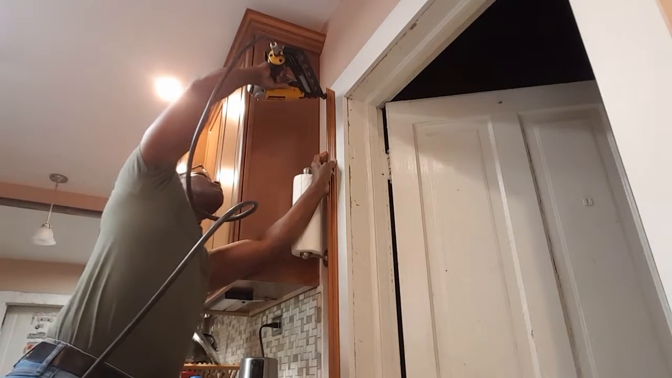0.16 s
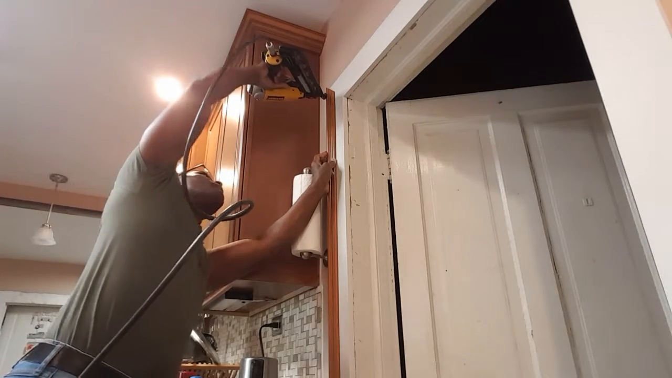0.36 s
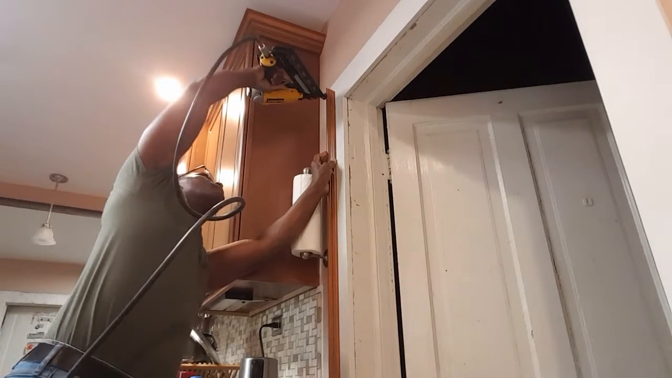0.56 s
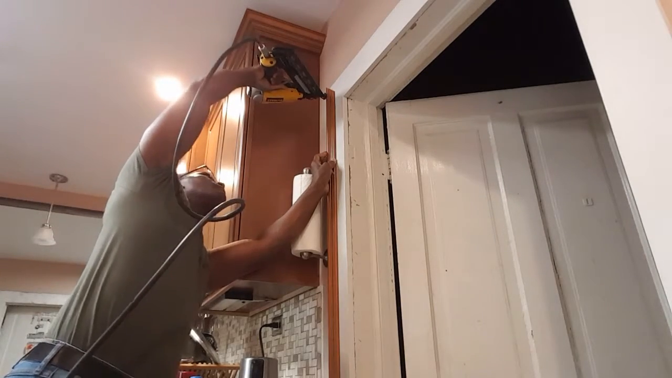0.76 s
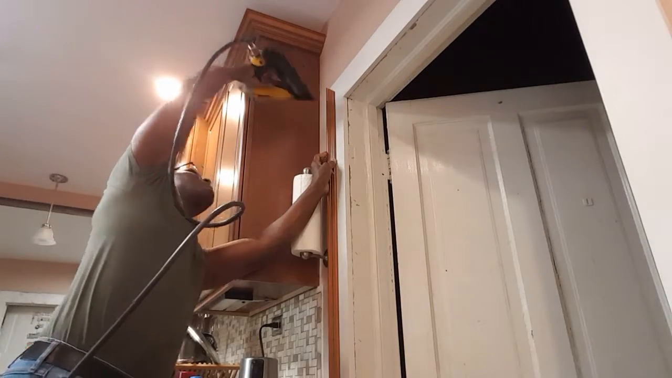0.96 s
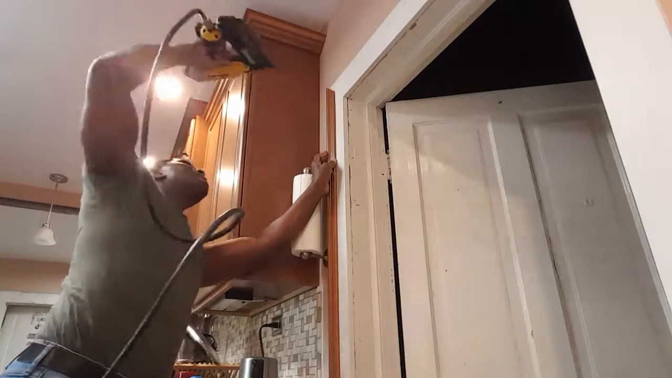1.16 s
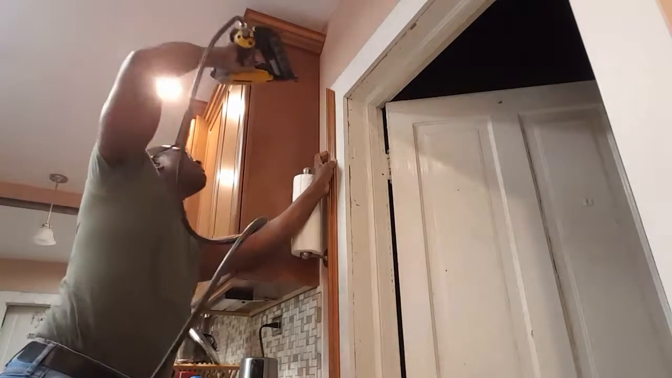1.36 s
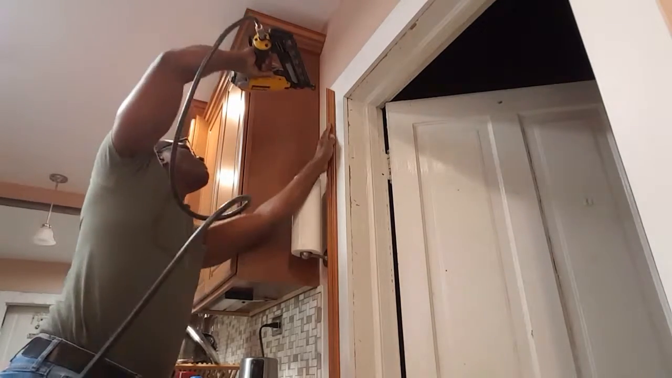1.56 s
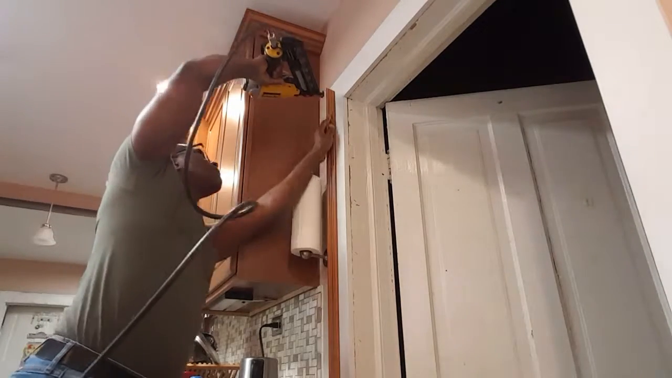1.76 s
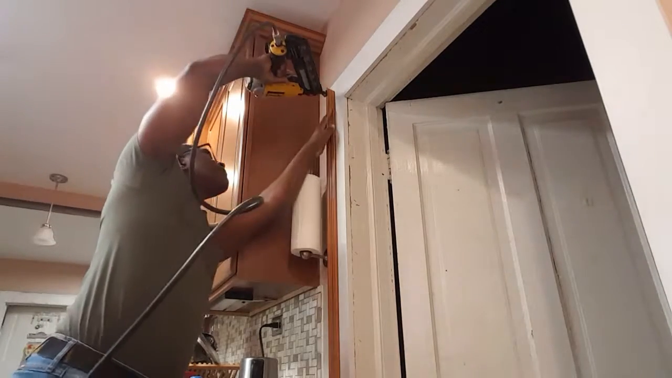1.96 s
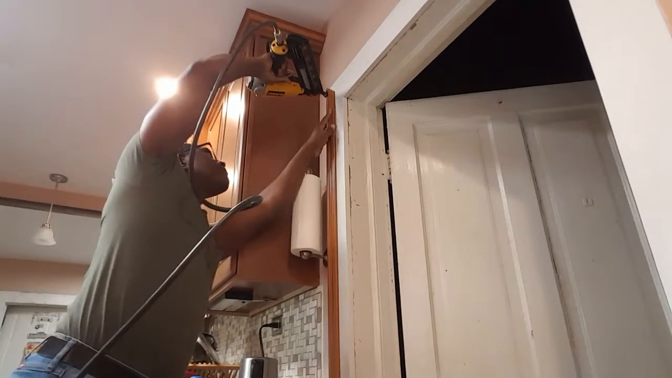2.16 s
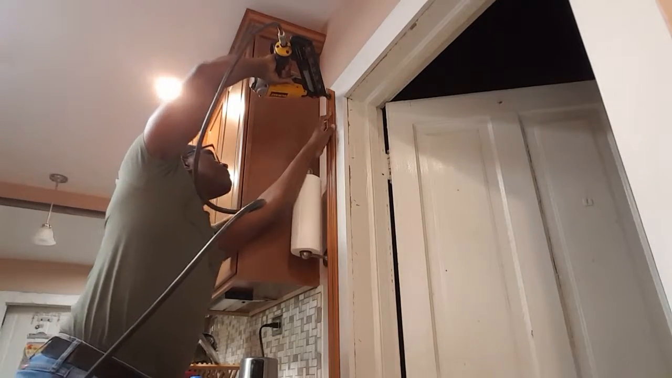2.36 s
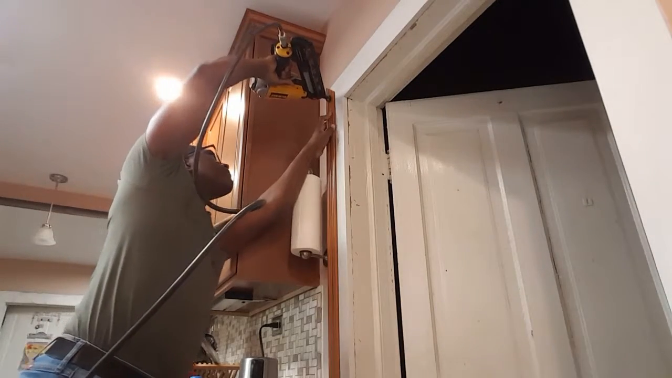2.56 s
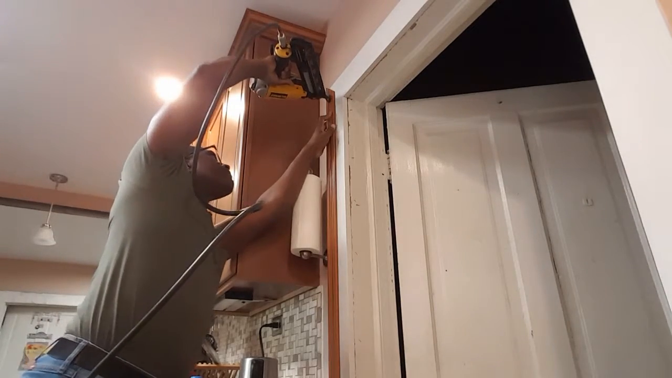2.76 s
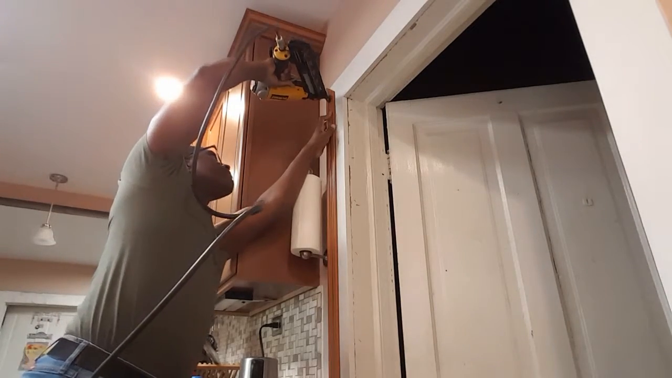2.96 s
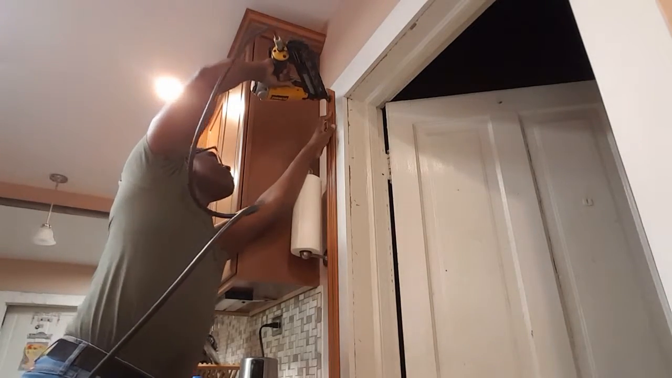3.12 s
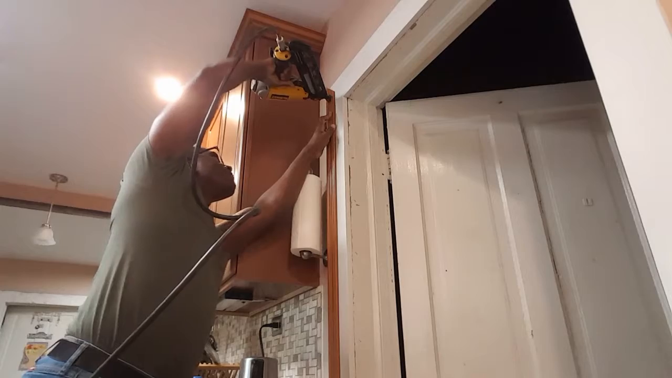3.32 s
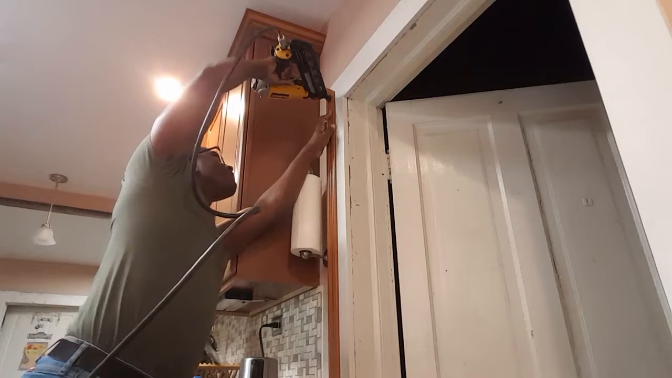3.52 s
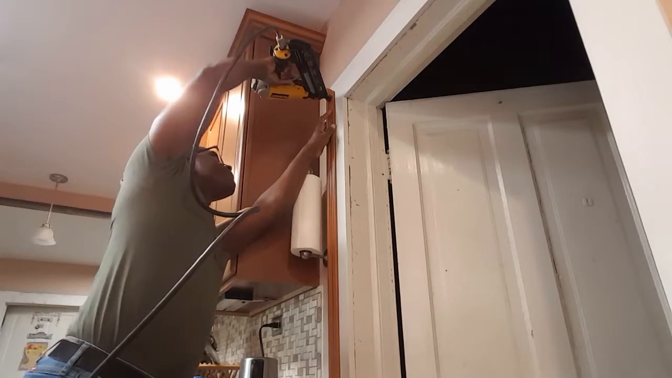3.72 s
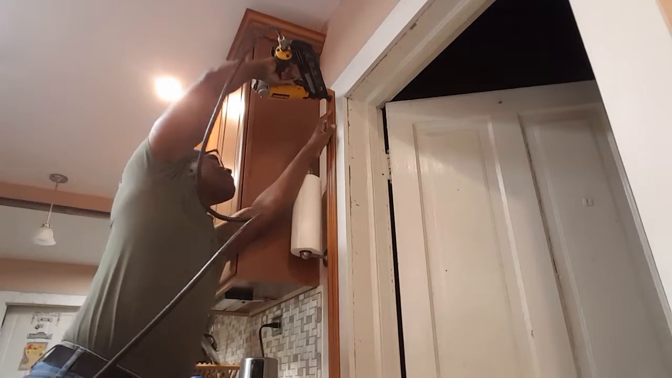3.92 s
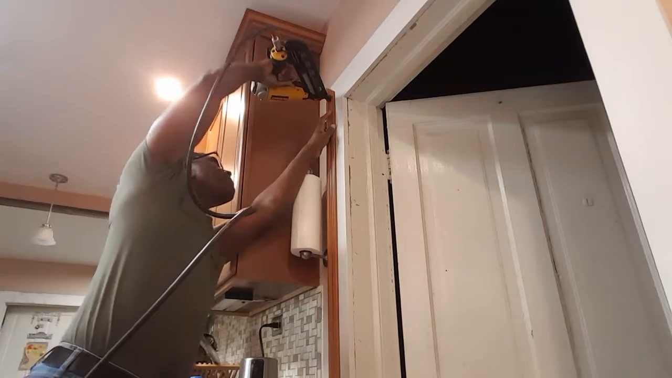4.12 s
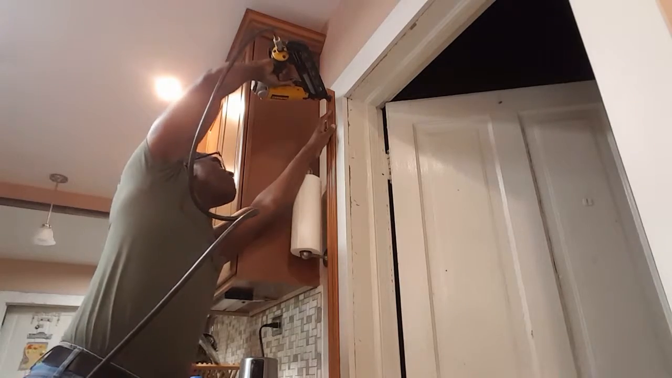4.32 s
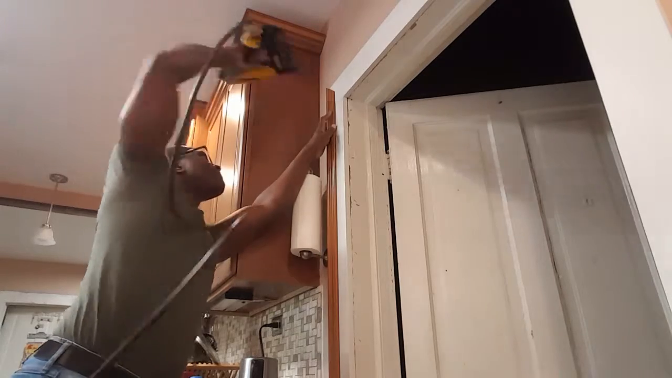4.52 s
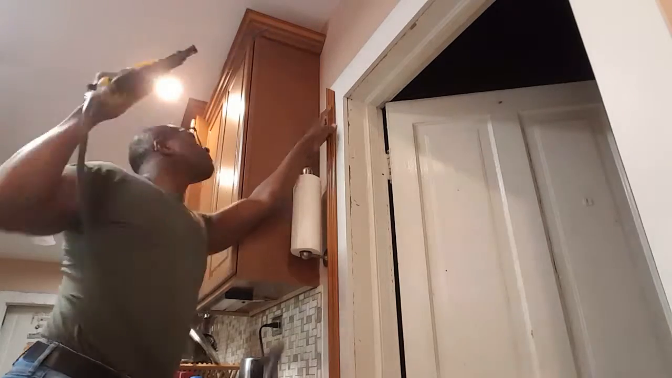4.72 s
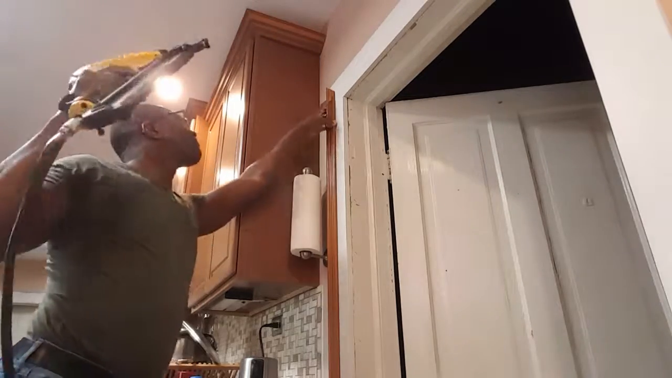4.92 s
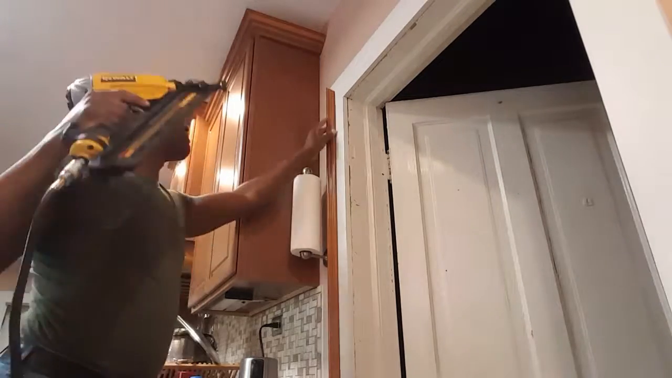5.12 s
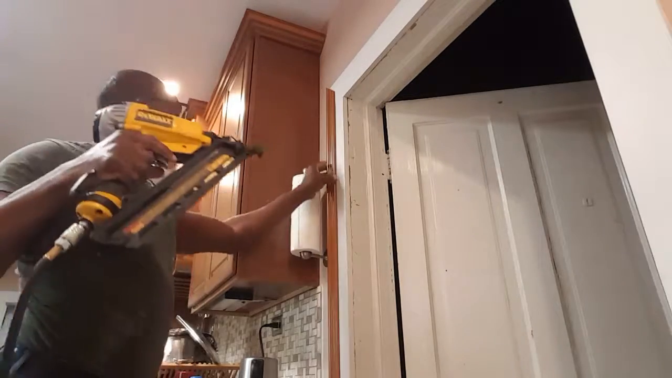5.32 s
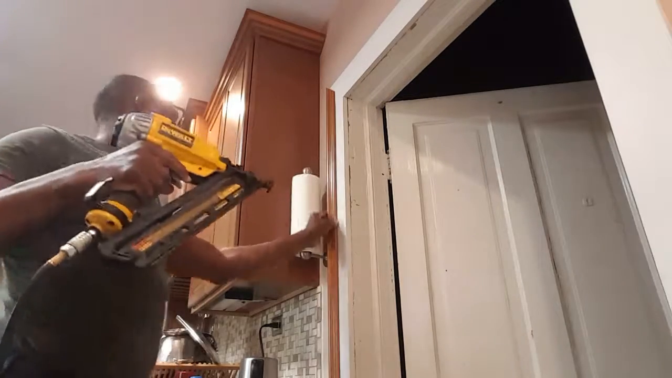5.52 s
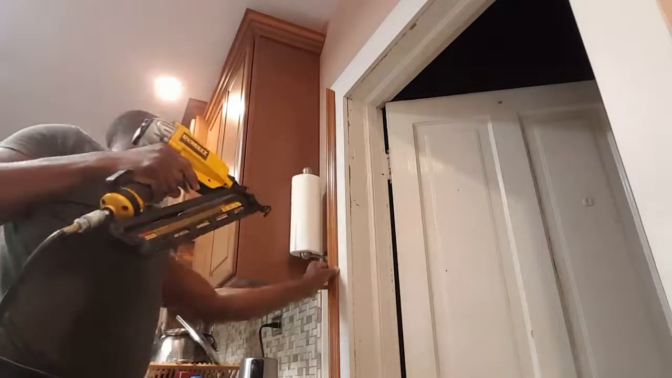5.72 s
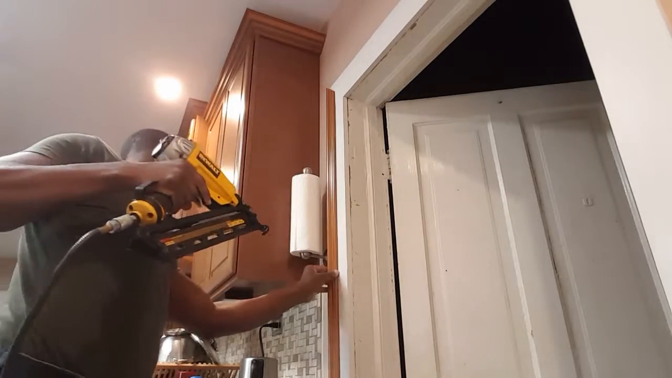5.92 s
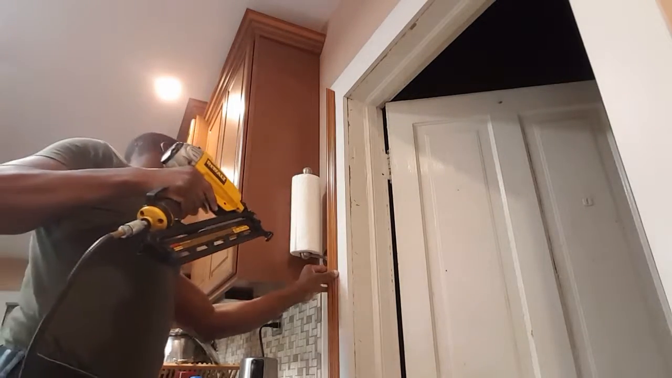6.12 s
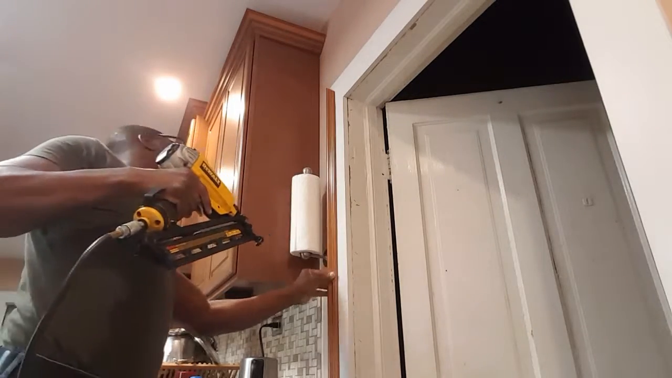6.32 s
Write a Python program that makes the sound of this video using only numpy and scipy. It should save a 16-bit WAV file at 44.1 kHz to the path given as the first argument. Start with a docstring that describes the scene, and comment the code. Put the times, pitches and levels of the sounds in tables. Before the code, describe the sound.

A pneumatic nailer bangs twice into wooden trim in a kitchen, each shot with an air burst, between quiet scuffs, ticks and woody knocks.

```python
"""Kitchen interior, two close microphones on an air nailer at wooden trim, over the house's rush and a low rumble.
First a hand slides while the tool taps, scrapes and ticks along the trim; at 1.04 s the first shot begins.
A shot: safety click, valve hiss, blows that crack and ring, an air blast, a soft piston return, the exhaust.
Then more strokes, ticks, taps and cabinet knocks; the second shot comes at 4.59 s, and handling follows.
Sources are shaped noise and dying modes with kitchen echoes; gain control ducks everything on loud peaks."""
import sys
import numpy as np
from scipy import signal
from scipy.fft import rfft, irfft, next_fast_len
from scipy.io import wavfile
from scipy.ndimage import uniform_filter1d, minimum_filter1d

SR = 44100
rng = np.random.default_rng(int(sys.argv[2]) if len(sys.argv) > 2 else 0)


def unload_wav(signal):
    """Save mono or channel-first audio to the path in sys.argv[1] as 16-bit WAV at rate SR, clipped to [-1, 1]."""
    wavfile.write(
        sys.argv[1],
        SR,
        np.round(np.clip(np.atleast_2d(signal).T, -1, 1) * 32767).astype(np.int16),
    )


N = 285591

# Firing cycles: trigger pulled [t/s], air blast [t/s], piston returns [t/s]
SHOTS = [(1.039, 1.083, 1.1662), (4.587, 4.6, 4.686)]
# Piston blows, fire then nail driven home:
# start [t/s], rattle level [level/dB], rise [t/s], rattle t60 [t/s], crack [level/dB], low push [level/dB]
PISTON_BLOWS = [(1.0784, 5.5, 0.00054, 0.1, 10.5, 2), (1.0919, 8, 0.0015, 0.044, -5, 1.5),
                (4.591, -6.5, 0.0057, 0.069, -15, -9.5), (4.6061, 9.5, 0.0014, 0.05, 9, -10.5)]
# Ring of the tool and trim: mode [f/Hz], relative [level/dB], t60 [t/s]
TOOL_MODES = [(116, -2, 0.1), (172, -0.5, 0.065), (199, 1.5, 0.056), (325, -1.5, 0.15), (413, -6, 0.071),
              (570, -1.5, .08), (726, -1, 0.055), (1115, -1, 0.048), (1270, -6.5, 0.035), (1510, -1, 0.026),
              (1550, 4, 0.03), (1667, 1.5, 0.12), (1790.5, -1.5, .06), (2560, -3.5, 0.057), (3010, 3, .045),
              (3600, -8, 0.025)]
# Crack of the steel driver: mode [f/Hz], relative [level/dB], t60 [t/s]
CRACK_MODES = [(616, -6, 0.019), (900, -4.5, 0.029), (1220, -7.5, 0.02), (1592, 1, 0.028),
               (2390, -6, 0.022), (3130, -4.5, 0.014), (3920, -3.5, 0.017)]
# Colour of the rattling parts: [f/Hz], relative [level/dB per Hz]
RATTLE_SPECTRUM = [(30, -16), (100, -0.5), (200, -0.5), (330, 3.5), (750, -3.5), (1100, 1.5), (1600, 0),
                   (2200, -4.5), (3200, -0.5), (4600, -7), (6000, -22.5), (14000, -41.5)]
# Colour of the piston landing on its bumper: [f/Hz], relative [level/dB per Hz]
BUMPER_SPECTRUM = [(40, -22), (90, -20), (160, -4.5), (380, 0), (750, -3.5), (1300, -3), (2500, -3.5),
                   (4600, -8.5), (6000, -19), (14000, -40.5)]
# Colour of the air jets: [f/Hz], relative [level/dB per Hz]
AIR_SPECTRUM = [(200, -26.5), (800, -17.5), (1500, -8), (3000, -14), (5000, 0), (6400, -1.5), (7300, 1.5),
                (8060, 4), (9500, -0.5), (11000, -5), (13200, -3), (15000, -9.5)]
# Light taps of the nose and magazine: start [t/s], onset [level/dB], treble shelf [level/dB], t60 [t/s]
LIGHT_TAPS = [(.281, -52, 6, 0.035), (.879, -60, 10, .1), (2.025, -51, -14, .13),
              (3.614, -51.5, -12, 0.067), (3.672, -39.5, -5, 0.02), (5.082, -39, -41, 0.073),
              (5.486, -48.5, -7, 0.18), (6.458, -45, -6.5, .05)]
# Thin metallic scrapes of the tool and its hose coupling: start [t/s], onset [level/dB], t60 [t/s], centre [f/Hz]
METAL_SCRAPES = [(.138, -46, 0.025, 5050), (0.146, -60, 0.053, 6270), (2.262, -65.5, 0.031, 8520),
                 (2.285, -73.5, 0.026, 8530), (2.823, -54.5, 0.06, 7680)]
# Knocks that ring the cabinet: start [t/s], panel [level/dB], pitch [factor on the panel modes],
# contact [level/dB], treble shelf [level/dB], contact t60 [t/s]
CABINET_KNOCKS = [(1.616, -37, 1.14, -48.5, 1, 0.11), (3.769, -38, 1.11, -43, -5, 0.021),
                  (3.997, -25.5, 1.02, -47.5, 11, 0.088), (5.564, -36, 1.31, -39.5, -14, 0.095),
                  (5.943, -36, 1.063, -49.5, 13.5, 0.14), (6.161, -31, 1.09, -45, 16, 0.081),
                  (6.196, -25.5, 1.01, -46.5, -45, 0.085)]
# Cabinet panel: mode before the pitch factor [f/Hz], relative [level/dB], t60 [t/s]
PANEL_MODES = [(126, -10, 0.12), (258, -20, 0.21), (298.6, 1.5, 0.072), (359, -6.5, 0.08),
               (540, -11, 0.052)]
# Ring of the nose piece: mode [f/Hz], relative [level/dB], t60 [t/s]
NOSE_MODES = [(940, 0, .03), (1300, -3.5, 0.09), (1624, -0.5, 0.025), (2030, -13.5, 0.019), (2550, -5, .02),
              (3930, -8, 0.018)]
# Colour of a contact's clatter, before its treble shelf: [f/Hz], relative [level/dB per Hz]
TAP_SPECTRUM = [(100, -12), (400, -1.5), (1000, 5.5), (1700, 1.5), (2500, -1.5), (4200, -8), (6000, -21),
                (9000, -22), (14000, -36)]
# Nose nudged along the trim: start [t/s], length [t/s], ticks [1/s], mean tick [level/dB], treble shelf [level/dB]
NOSE_NUDGES = [(.315, .115, 43, -56.5, 17), (2.379, .8, 4, -59, 4), (3.861, .36, 12, -57, 12)]
# Strokes of a hand on the wood or a sleeve:
# start [t/s], length [t/s], at full speed before the overall trim in sliding() [level/dB]
HAND_STROKES = [(.12, 0.43, -64.5), (1.563, 0.22, -61.5), (1.666, .27, -51.5), (1.845, .56, -63.5),
                (4.796, 0.33, -61), (5.209, 0.45, -54.5), (5.522, .54, -51), (6.049, 0.55, -68)]
# Colour of the rubbing: [f/Hz], relative [level/dB per Hz]
RUB_SPECTRUM = [(150, -8), (600, -2), (1400, -0.5), (2500, -4.5), (4000, -8.5), (6000, -16.5), (8500, -12),
                (11000, -22.5), (14500, -22)]
# Kitchen reverberation: [f/Hz], t60 [t/s]
KITCHEN_T60 = [(60, 0.15), (200, 0.12), (600, 0.19), (1500, 0.21), (4000, 0.25), (8000, 0.23), (14000, .22)]
# Likeness of left and right microphones: [f/Hz], correlation [0 to 1]
MIC_LIKENESS = [(40, 0.073), (120, 0.11), (300, 0), (700, 0.27), (2000, 0.06)]
# Low room rumble: resonance [f/Hz], rms [level/dB], random wander rate [f/Hz]
RUMBLE_RESONANCES = [(61.8, -59, 7.3), (159.3, -64.5, 6.2), (252.5, -65.5, 7.2), (390, -63, 9.6),
                     (1210, -82, 5)]
# Colour of the house's rush: [f/Hz], relative [level/dB per Hz]
ROOM_SPECTRUM = [(20, -5), (30, -15.5), (60, -6), (100, -11.5), (160, -4.5), (205, -11), (250, -8),
                 (330, -10), (400, -8.5), (460, -12), (650, -20.5), (1360, -26.5), (4000, -40),
                 (14600, -50.5)]

# Safety nose clicks in just before the trigger
SAFETY_LEAD_S, SAFETY_DB, SAFETY_TREBLE_DB, SAFETY_T60_S = 0.014, -51.5, 16, 0.14
VALVE_DB, VALVE_RISE_S, VALVE_T60_S = -38.5, 0.005, 0.06
BLAST_DB, BLAST_RISE_S, BLAST_OPEN_S, BLAST_T60_S = -1, 0.0075, 0.0066, 0.054
RETURN_DB, RETURN_RISE_S, RETURN_T60_S = 4.5, 0.011, 0.07
# Exhaust opens just after the piston lands on its bumper
EXHAUST_LAG_S, EXHAUST_DB, EXHAUST_RISE_S, EXHAUST_OPEN_S, EXHAUST_T60_S = 0.0103, -6, 0.0025, 0.028, 0.082
TICK_T60_S, TICK_SPREAD_DB = 0.045, 1  # spread is either way
SPEED_POWER = 1.4  # rubbing amplitude grows as this power of the hand's speed
EDGE_HZ = 14800  # upper limit of the recorded band

T = np.arange(SR // 2) / SR  # half a second of time for each short event
SIZE = next_fast_len(N + SR // 2, True)
HZ = np.fft.rfftfreq(SIZE, 1 / SR)


def piston(push_hz=110, push_t60=0.02, ring_db=-8, return_ring_db=-8, chatter_db=2, chatter_hz=300, radiate_hz=35):
    """A blow is a steel crack, a rattle of parts, a low push on the wall and a short ring; the return is softer."""
    out, loose = np.zeros((2, 2, N))
    push = np.sin(2 * np.pi * push_hz * T) * fade(push_t60)
    for s, db, rise, t60, crack_db, push_db in PISTON_BLOWS:
        add(loose, s, amp(db) * noise(RATTLE_SPECTRUM, len(T)) * swell(rise, t60))
        body = amp(db + ring_db) * ring(TOOL_MODES, 4.5, rise)
        crack = amp(crack_db) * ring(CRACK_MODES, 5.5, rise / 2)
        add(out, s, body + crack + amp(push_db) * push)
    for _, _, back in SHOTS:
        landing = noise(BUMPER_SPECTRUM, len(T)) * swell(RETURN_RISE_S, RETURN_T60_S)
        add(loose, back, amp(RETURN_DB) * landing)
        add(out, back, amp(RETURN_DB + return_ring_db) * ring(TOOL_MODES, 2.0, RETURN_RISE_S))
    clumps = unit(amp(chatter_db * drift(chatter_hz)))  # loose parts strike in clumps
    return highpass(out + loose * clumps, radiate_hz)  # a small body radiates little deep bass


def air(flutter_db=0.5, flutter_hz=250):
    """Each shot lets out three sputtering noise jets (valve, blast, exhaust) that open fast and die exponentially."""
    level = np.zeros((1, N))
    for trigger, blast, back in SHOTS:
        add(level, trigger, amp(VALVE_DB) * swell(VALVE_RISE_S, VALVE_T60_S, blast - trigger))
        add(level, blast, amp(BLAST_DB) * swell(BLAST_RISE_S, BLAST_T60_S, BLAST_OPEN_S))
        exhaust = amp(EXHAUST_DB) * swell(EXHAUST_RISE_S, EXHAUST_T60_S, EXHAUST_OPEN_S)
        add(level, back + EXHAUST_LAG_S, exhaust)
    return level * noise(AIR_SPECTRUM, SIZE)[:, :N] * amp(flutter_db * drift(flutter_hz))


def handling(scrape_rise=0.006, panel_rise=0.0046, panel_lag=0.0011):
    """The tool is set against the trim: taps, safety clicks, thin scrapes and knocks that ring the cabinet."""
    out = np.zeros((2, N))
    for s, db, treble_db, t60 in LIGHT_TAPS:
        add(out, s, tap(db, treble_db, t60))
    for trigger, _, _ in SHOTS:
        add(out, trigger - SAFETY_LEAD_S, tap(SAFETY_DB, SAFETY_TREBLE_DB, SAFETY_T60_S))
    for s, db, t60, hz in METAL_SCRAPES:
        band = [(hz / 4, -22), (hz * 0.75, -10), (hz, 0), (hz * 1.3, -12), (hz * 2, -15)]
        add(out, s, amp(db) * noise(band, len(T)) * swell(scrape_rise, t60))
    for s, panel_db, pitch, db, treble_db, t60 in CABINET_KNOCKS:
        modes = [(hz * pitch, mode_db, mode_t60) for hz, mode_db, mode_t60 in PANEL_MODES]
        add(out, s, tap(db, treble_db, t60))
        add(out, s + panel_lag, amp(panel_db) * ring(modes, 1.0, panel_rise))
    return out


def tap(db, treble_db, t60, softness=0.06, nose_db=-4):
    """One contact of the tool: a short clatter and the ring of the nose piece."""
    rise = softness * t60  # a longer contact also starts more softly
    clatter = noise(TAP_SPECTRUM, len(T), treble_db) * swell(rise, t60)
    return amp(db) * (clatter + amp(nose_db) * ring(NOSE_MODES, np.pi, rise))


def nudging():
    """Faint nose contacts of random time and strength, one in each equal slot, while the nose is lined up."""
    out = np.zeros((2, N))
    for start, length, rate, db, treble_db in NOSE_NUDGES:
        for k, (late, strength) in enumerate(rng.random((round(length * rate), 2))):
            tick_db = db + TICK_SPREAD_DB * (2 * strength - 1)
            add(out, start + (k + late) / rate, tap(tick_db, treble_db, TICK_T60_S))
    return out


def sliding(grain_db=1.0, grain_hz=90, level_db=-2):
    """In each stroke the hand speeds up and slows down in one arch, its noise flickering as it catches on the grain."""
    t, power = np.arange(N) / SR, np.zeros(N)
    for start, length, db in HAND_STROKES:
        speed = np.sin(np.pi * np.clip((t - start) / length, 0, 1))
        power += (amp(db) * abs(speed) ** SPEED_POWER) ** 2
    grain = amp(level_db + grain_db * drift(grain_hz))
    return grain * np.sqrt(power) * noise(RUB_SPECTRUM, SIZE)[:, :N]


def kitchen(x, blend_hz=7, bass_hz=130):
    """Kitchen echoes: two random echo sets blend slowly in turn for an even tail; the deep bass stays dry."""
    turn = 2 * np.pi * blend_hz * np.arange(N) / SR
    sent = highpass(x, bass_hz)
    shares = (np.cos(turn), np.sin(turn))
    return sum(signal.oaconvolve(sent * share, reflections(), axes=1)[:, :N] for share in shares)


def reflections(gap=0.003, build=0.0021, echoes_per_s=4000):
    """Dense random echoes from cabinets and walls, after a short gap; each band dies at its own speed."""
    echoes = rng.choice([-1., 1.], (2, len(T))) * (rng.random((2, len(T))) < echoes_per_s / SR)
    echoes = irfft(paired(rfft(echoes), np.fft.rfftfreq(len(T), 1 / SR)), len(T))
    hz, t, bands = signal.stft(echoes, SR, nperseg=256)
    decay = np.exp(-np.log(1000) * t / read(KITCHEN_T60, hz)[:, None])
    tail = signal.istft(bands * decay, SR, nperseg=256)[1][:, :len(T)]
    tail = tail * np.clip((T - gap) / build, 0, 1)
    return tail / np.linalg.norm(tail, axis=1, keepdims=True)


def background(tone_db=-53.5, steady=0.52, swell_db=1.26):
    """Gently swelling noise for the rush of the house, with narrow rumble bands that wander in strength and phase."""
    t = np.arange(N) / SR
    out = amp(tone_db + swell_db * drift(3)) * noise(ROOM_SPECTRUM, SIZE)[:, :N]
    for hz, db, rate_hz in RUMBLE_RESONANCES:
        phase = 2 * np.pi * hz * t + rng.uniform(-0.5, 0.68, (2, 1))
        rumble = (steady + drift(rate_hz)) * np.cos(phase) + drift(rate_hz) * np.sin(phase)
        out += amp(db) * unit(rumble)
    return out


def amp(db):
    """Decibels to gain."""
    return 10 ** (np.asarray(db) / 20)


def unit(x):
    """Scales to rms 1."""
    return x / np.sqrt(np.mean(x ** 2) + 1e-20)


def read(points, hz):
    """Reads a table on a log-frequency axis."""
    f, value = np.transpose(points)
    return np.interp(np.log(hz + 1), np.log(f), value)


def fade(t60):
    """Exponential decay, 60 dB in t60 seconds."""
    return np.exp(-np.log(1000) * T / np.maximum(t60, 1e-3))


def swell(rise, t60, hold=0):
    """Rises to 1, stays there for a while, then dies away."""
    falling = np.maximum(T - rise - hold, 0)
    return np.minimum(T / max(rise, 1e-4), 1) * np.exp(-np.log(1000) * falling / max(t60, 1e-3))


def add(mix, s, sound):
    """Mixes a sound in at time s."""
    part = mix[:, round(s * SR):][:, :sound.shape[-1]]
    part += sound[..., :part.shape[1]]


def paired(z, hz):
    """Gives two spectra the partial likeness of two close microphones."""
    same = np.clip(read(MIC_LIKENESS, hz), -1, 1)
    return np.array([z[0], same * z[0] + np.sqrt(1 - same ** 2) * z[1]])


def noise(spectrum, size, treble_db=0, shelf_hz=4500):
    """Stereo noise of a given colour and rms 1, with a treble shelf."""
    hz = np.fft.rfftfreq(size, 1 / SR)
    shelf = treble_db * hz ** 2 / (hz ** 2 + shelf_hz ** 2)
    white = paired(rfft(rng.standard_normal((2, size))), hz)
    return unit(irfft(white * amp(read(spectrum, hz) + shelf), size))


def drift(rate_hz):
    """Random motion of rms 1, with little above rate_hz."""
    return unit(irfft(rfft(rng.standard_normal(SIZE)) * np.exp(-(HZ / rate_hz) ** 2), SIZE)[:N])


def ring(modes, spread, rise, apart_hz=800):
    """Dying modes of one struck body; short waves reach the two microphones in different phases."""
    out = np.zeros((2, len(T)))
    for hz, db, t60 in modes:
        phase = spread * min(hz / apart_hz, 1) * (2 * rng.random((2, 1)) - 1)
        out += amp(db) * fade(t60) * np.sin(2 * np.pi * hz * T + phase)
    undamped_rms = np.sqrt(sum(amp(db) ** 2 for _, db, _ in modes) / 2)
    return out * (1 - np.exp(-T / max(rise, 1e-4))) / undamped_rms


def highpass(x, hz):
    """Second-order low cut."""
    return signal.sosfilt(signal.butter(2, hz, "highpass", fs=SR, output="sos"), x)


def scene(blow_wet_db=0, air_wet_db=0, small_wet_db=-2, air_pan_db=0.8):
    """All sources with their reflections in the kitchen, the air jets slightly to the left."""
    blows, jets = piston(), air() * amp([[air_pan_db], [-air_pan_db]])
    house = background()
    small = handling() + sliding() + nudging()
    sent = amp(blow_wet_db) * blows + amp(air_wet_db) * jets + amp(small_wet_db) * small
    return blows + jets + small + kitchen(sent) + house


def record(dry, threshold_db=-15, depth_db=14, hold=0.34):
    """Gain control drops at once, holds (s) and lets go; peaks overload softly; then the band limit."""
    power_db = 10 * np.log10(abs(uniform_filter1d((dry ** 2).mean(0), size=128)) + 1e-12)
    over_db = np.clip(power_db - threshold_db, 0, depth_db)
    half = int(hold * SR / 2)
    # the largest excess within the past hold time
    held_db = -minimum_filter1d(-over_db, 2 * half + 1, origin=half, mode="constant")
    ducked = dry * amp(-uniform_filter1d(held_db, size=64))
    limited = ducked / (1 + ducked ** 6) ** (1 / 6)
    band_limit = signal.firwin(401, EDGE_HZ, window=("kaiser", 8), fs=SR)
    return signal.oaconvolve(limited, band_limit[None], "same")


dry = scene()
out = record(dry)
unload_wav(out)
```